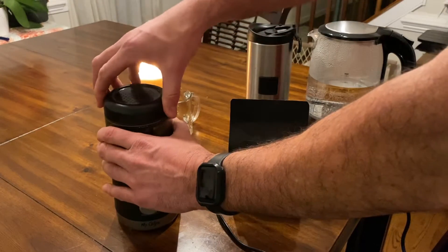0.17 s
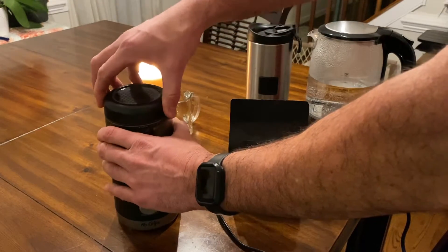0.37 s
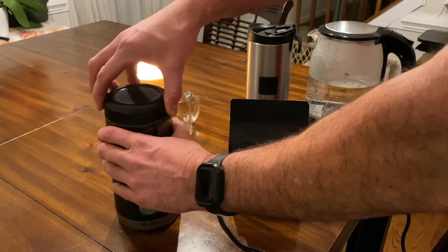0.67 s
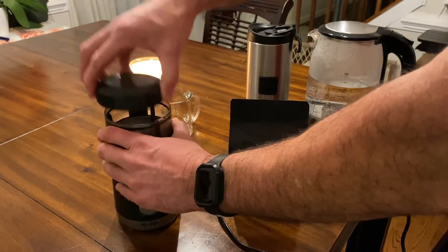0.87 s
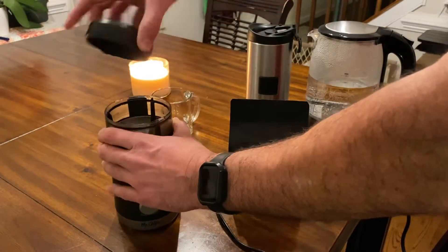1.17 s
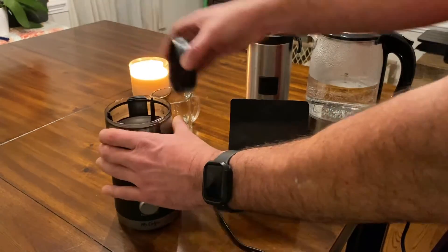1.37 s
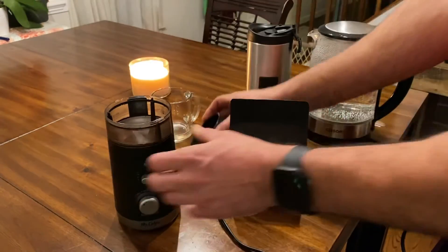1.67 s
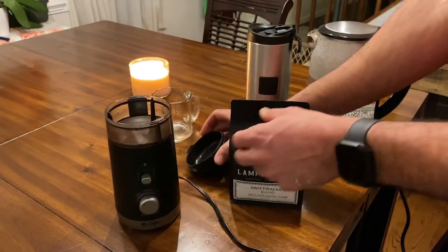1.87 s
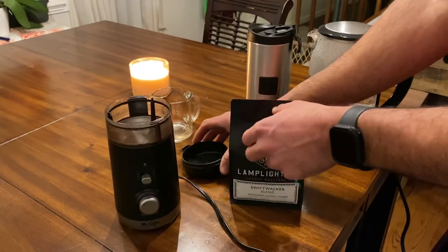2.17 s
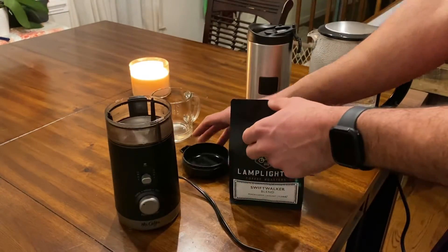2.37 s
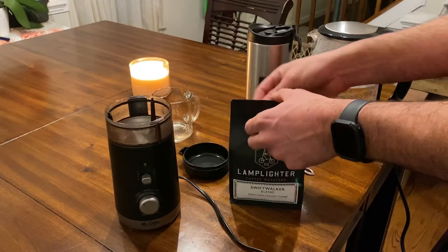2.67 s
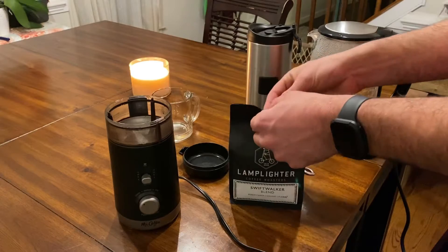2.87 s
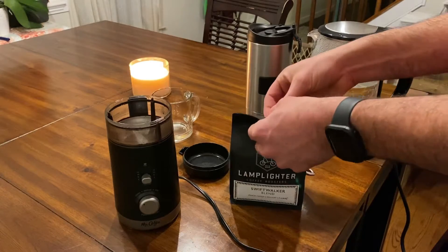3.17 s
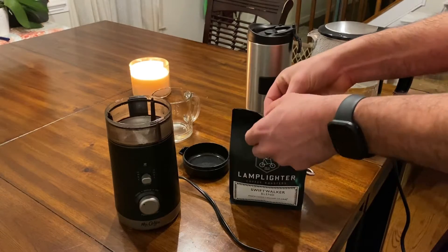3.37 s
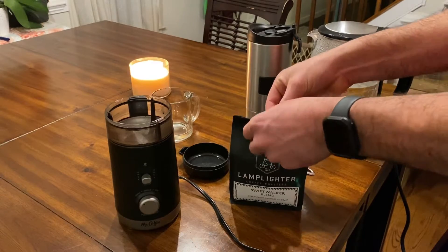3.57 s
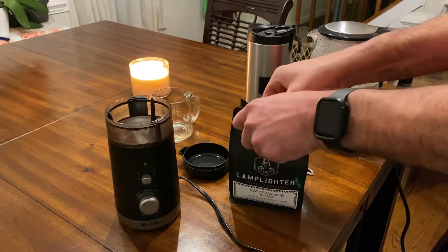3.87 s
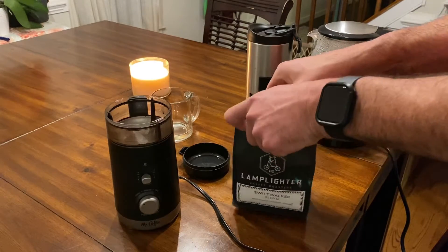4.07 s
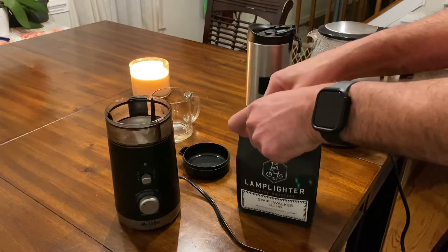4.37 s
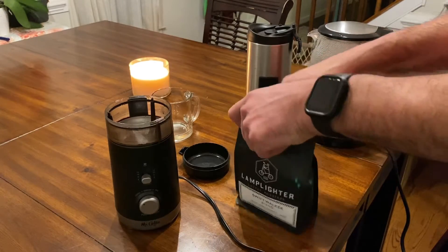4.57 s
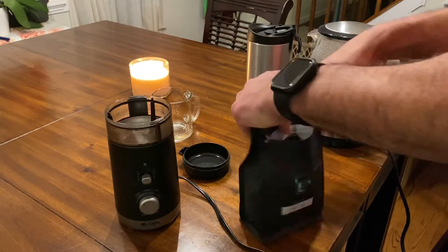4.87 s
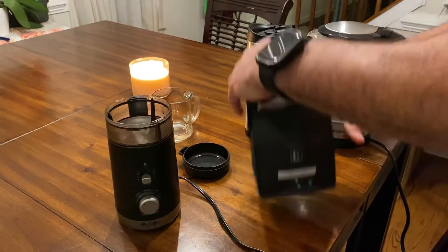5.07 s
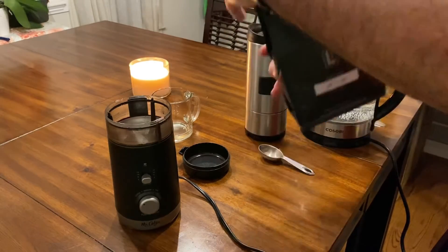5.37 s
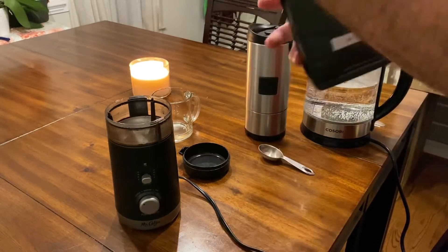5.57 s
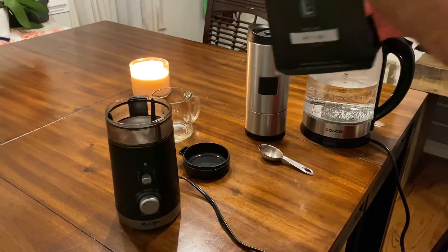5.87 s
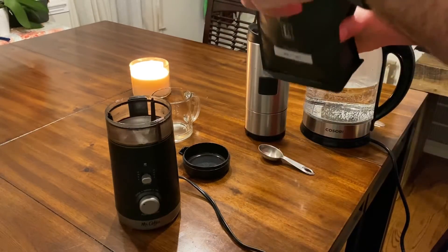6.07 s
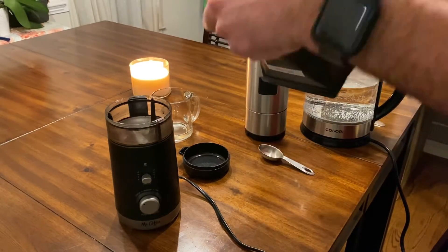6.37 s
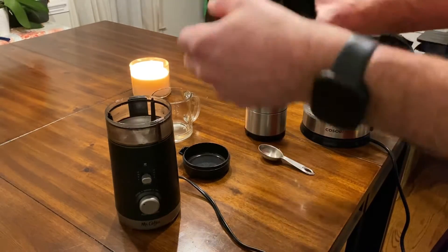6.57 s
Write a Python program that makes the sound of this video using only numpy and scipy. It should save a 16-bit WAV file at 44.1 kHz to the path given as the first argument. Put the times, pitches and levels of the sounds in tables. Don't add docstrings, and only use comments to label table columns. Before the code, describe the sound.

Close up in a small kitchen, a lid comes free with a rising gulp, lands hollowly, scrapes, and a foil coffee bag rustles and snaps.

```python
import sys
import numpy as np
from scipy import signal
from scipy.fft import rfft, irfft, next_fast_len
from scipy.io import wavfile
from scipy.ndimage import uniform_filter1d

SR = 44100
rng = np.random.default_rng(int(sys.argv[2]) if len(sys.argv) > 2 else 0)


def attenuation_scalar(level_db):
    decades = np.asarray(level_db, float) / 20
    return 10 ** decades


def generate_wav(sig):
    pcm = np.round(np.clip(np.atleast_2d(sig).T, -1, 1) * 32767).astype(np.int16)
    wavfile.write(sys.argv[1], SR, pcm)


N = 296793

# frequency in Hz, level in dB per Hz.
RUMBLE = [(15, -46), (25, -31), (40, -9.5), (65, 2), (92, -10), (154, -9.5), (171, -17), (207, -9.5),
          (265, -22), (455, -25), (565, -33.5), (1380, -49), (16300, -64.5)]
RUMBLE_DB = -52
# frequency in Hz, likeness from 0 to 1.
RUMBLE_ALIKE = [(60, .991), (130, .92), (290, .8), (640, .2), (15000, .1)]

# frequency in Hz, level in dB per Hz.
FOIL = [(250, -38.5), (500, -20.5), (900, -7.5), (1500, 4), (3000, -1.5), (5000, 2), (8000, -15.5),
        (16000, -6)]
# start in seconds, length in seconds, level in dB,
# brightness in dB.
SETTLES = [(0, .13, -58.5, 0), (.36, 0.038, -61, 0.5), (.612, 0.007, -71, -3), (1.027, 0.011, -76, -3.5),
           (2.092, 0.24, -64, 8.5), (2.73, 0.18, -55, 3.5), (3.48, .17, -57.5, 3.5),
           (3.92, 0.026, -49.5, 4.5), (4.14, 0.019, -38, -2), (4.51, 0.16, -50, 0.5),
           (4.69, 0.228, -49.5, 3), (4.9, 0.13, -69.5, -1.5), (5.09, 0.024, -65, 5.5),
           (5.24, 0.1, -56, -1.5), (5.37, 0.06, -53, 1.5), (5.65, 0.16, -44.5, -0.5),
           (5.8, 0.12, -50.5, -0.5), (6.17, 0.041, -37.5, 0.5), (6.29, 0.23, -51.5, -1),
           (6.55, 0.018, -68, -1)]
# start in seconds, length in seconds, level in dB, brightness in dB.
HOLDS = [(1.24, 0.072, -81, 2), (1.9, 0.21, -72, -6.5), (2.28, 0.27, -60, 3.5), (2.67, 0.049, -63.5, -4),
         (2.936, 0.042, -64.5, 7), (3.024, 0.18, -62, 4), (3.345, 0.13, -60, 1.5), (3.97, 0.13, -59, 7),
         (4.2, 0.27, -59.5, -1.5), (5.57, 0.045, -57, -1.5), (6.02, 0.085, -50.5, 1)]
# start in seconds, length in seconds, final level in dB,
# brightness in dB.
PULLS = [(.43, 0.047, -59, 2), (.716, 0.087, -48.5, 1.5), (1.35, 0.047, -69, -3), (1.7, 0.12, -59.5, 1),
         (3.25, 0.065, -53.5, 1.5), (5.15, 0.092, -50.5, 3), (5.46, 0.077, -48.5, -1.5),
         (5.6, 0.042, -49, -1.5)]
SAG_DB_PER_S, SWELL_DB_PER_S, ATTACK_DB_PER_S, RELEASE_DB_PER_S = 52.5, 177.5, 1492, 322
LOW_DB, LOW_PER_BRIGHT, HIGH_DB = -0.5, -1.8, -4.5
TOP_DB, TOP_PER_BRIGHT = -11.5, 1.6

# time in seconds, pitch in Hz, level in dB.
GULP = [
    (.778, 303, -49),
    (.787, 447, -47.5),
    (.797, 745, -47),
    (.81, 900, -44.5),
    (.815, 1000, -62.5),
]
GULP_FLUTTER = 0.94
# start in seconds, level in dB, pitch in Hz,
# time to fall 60 dB in seconds.
THUDS = [(.785, -39.5, 149.5, 0.16), (1.78, -35, 343, 0.12), (2.499, -41, 111, 0.16),
         (2.602, -49, 278, 0.041), (2.85, -32.5, 230, 0.015), (2.921, -38.5, 67.3, 0.24),
         (3.265, -40, 290, 0.023), (3.905, -30, 280, 0.036), (4.151, -35.5, 220, 0.07),
         (4.195, -25.5, 166, 0.052), (4.201, -39.5, 57.9, 1), (4.235, -32.5, 210, 0.034),
         (4.262, -33.5, 382, 0.032), (4.695, -30.5, 293, 0.032), (5.69, -40.5, 200, 0.076),
         (6.201, -33, 224, 0.054)]
# start in seconds, level in dB, pitch in Hz,
# time to fall 60 dB in seconds.
RIM = [
    (.785, -36.5, 370, 0.034),
    (.792, -36.5, 600, 0.033),
    (.799, -39, 850, .03),
    (0.806, -34, 1100, .03),
    (.814, -36, 950, .06),
    (1.032, -61, 1100, 0.11),
    (1.032, -66, 4470, 0.12),
    (1.032, -71, 1960, .08),
    (1.8, -65, 4550, 0.35),
]

# start in seconds, peak in dB, panel pitch in Hz,
# low knock in dB, sizzle in dB.
CRISP = [(.813, -20, 775, -30.5, -0.5), (2.712, -40.5, 730, 4, -7), (2.842, -39, 2600, 4, -3.5),
         (3.3323, -20, 2600, -11, -23), (3.405, -33.5, 1830, -5.5, 1.5), (3.676, -17, 2340, -6.5, -5),
         (3.726, -25, 1560, 6.5, -6.5), (3.795, -15, 1380, -14.5, -0.5), (3.847, -19.5, 1340, -0.5, -2.5),
         (3.862, -13.5, 1510, -12, 2), (4.138, -19.5, 3500, -13, -16.5), (4.145, -18.5, 1430, 0.5, -6),
         (4.385, -41, 1570, -13, -8), (4.422, -9, 1255, -33, -5.5), (4.449, -15, 1280, -2.5, -1.5),
         (4.499, -25, 1320, 0, -7.5), (5.088, -47.5, 1090, -13, -1.5), (5.194, -32.5, 1800, -19, -10.5),
         (5.218, -16, 1830, -16, -2), (5.382, -30, 1520, -26, -6), (5.388, -22, 1355, -13, -7),
         (5.685, -14.5, 1440, -7, -1), (5.746, -18.5, 1530, -12, -1), (5.786, -18, 2030, -0.5, -1.5),
         (5.84, -36.5, 791, 4, -8), (6.159, -21, 1190, -5, -2), (6.326, -27, 1780, -9, -4),
         (6.542, -21.5, 1560, -2.5, -7)]
CRISP_PAN_DB = 0.9
# start in seconds, peak in dB, panel pitch in Hz,
# low knock in dB.
CATCH = [
    (.81, -20, 1083, -20),
]
DULL = [(1.775, -15, 1280, 3.5), (1.78, -19, 1100, 2), (2.099, -32.5, 1440, -29), (2.345, -21.5, 1150, 3.5),
        (2.753, -34.5, 1710, -6), (3.218, -46, 1210, 8), (3.264, -47, 844, 17), (3.462, -35.5, 2270, 2.5),
        (3.704, -30.5, 1150, 9.5), (4.098, -40, 1420, -1), (4.157, -23, 1210, -31), (4.758, -35, 1190, 2),
        (4.785, -40.5, 835, 1), (4.848, -32.5, 1840, -27), (5.395, -24.5, 1500, -15.5),
        (5.533, -29, 1510, -7), (5.626, -20.5, 1390, -0.5), (5.65, -16.5, 1520, -1), (5.91, -28, 754, -4),
        (6.005, -34, 754, -18), (6.033, -28, 1400, 1), (6.122, -19.5, 1570, -12), (6.299, -30.5, 940, -18),
        (6.526, -41, 1660, -10)]
TICKS = [
    (1.031, -57.5, 4450, -11.5),
    (2.099, -49, 703, -20),
    (3.027, -48, 2470, -22.5),
    (4.443, -29.5, 1350, -34),
    (6.171, -18, 1630, -5.5),
]
LEFT = [(3.904, -24, 2970, 5), (5.313, -34, 1480, -10), (5.618, -31.5, 1440, -20.5)]
BELLIES = [(0.88, -38, 730, -22.5), (2.092, -36.5, 1260, -19), (3.333, -21.5, 730, -25),
           (4.423, -19.5, 560, -3.5), (3.796, -15.5, 3200, -36)]
GRIT = [(2.298, -37, 4040, -28), (2.3191, -40, 3970, -30), (2.344, -37, 4000, -30),
        (2.3725, -40.5, 4000, -30), (2.3914, -44, 4000, -30), (2.4184, -52, 4000, -30),
        (2.4607, -56, 4000, -30), (2.4758, -42, 3980, -30), (2.669, -66, 4000, -30)]
MUTED = [(3.781, -23.5, 1680, -29), (4.349, -37, 1830, 6), (4.372, -38, 1830, -12), (4.692, -28, 970, -1),
         (4.907, -35.5, 1190, 3), (6.25, -23.5, 1330, -6), (6.314, -25.5, 1470, -34)]
MORE_POPS = [(2.683, -50, 800, -10), (3.274, -51, 800, -12), (3.291, -43, 1860, -15), (3.49, -45, 3000, -15.5),
             (4.19, -30, 2000, -9), (4.305, -48, 1590, -10), (4.814, -34.5, 2960, -15), (4.994, -53, 1090, -10),
             (5.171, -53, 4900, -20), (5.539, -33, 2090, -11), (5.564, -27, 1380, -12),
             (5.632, -25, 1010, -5.5), (5.885, -33.5, 1800, -19.5), (6.055, -32, 1710, -15),
             (6.062, -38, 2420, -15), (6.185, -19, 4470, -20.5), (6.412, -42, 2000, -15)]
# table, sizzle in dB, left over right in dB.
FAMILIES = [(MORE_POPS, -15.5, 1.2), (DULL, -16, 1.2), (TICKS, 11.4, 2.1), (LEFT, -34, 14.8), (CATCH, 6.1, 8.8),
            (BELLIES, -33.5, 1.2), (GRIT, 1, 2.8), (MUTED, -38.5, 1.2)]
NEIGHBOUR_DB, NEIGHBOUR_OCT = -6.5, .7

# frequency in Hz, time to fall 60 dB in seconds.
KITCHEN = [(200, 0.59), (530, 0.3), (1390, 0.33), (3680, 0.31), (9700, 0.18)]

# pitch in Hz, level in dB, time to fall 60 dB in seconds.
LID_MODES = [(380, -23.5, 0.21), (443, -11, 0.087), (633, -31, 0.051), (755, -11, 0.39), (819, 5, 0.054),
             (1100, 8, 0.05), (1176, 2.5, 0.081), (1480, -5, 0.043), (1680, -1.5, 0.04), (1982, -7.5, 0.07),
             (4550, -32.5, 0.1), (6380, -20.5, 0.088), (14200, -26, 0.065)]
# start in seconds, level in dB, hardness in dB per octave.
LID_BLOWS = [
    (1.032, -68, -2),
    (1.778, -25.5, 0),
    (1.798, -33.5, 2.5),
    (1.89, -41, -6),
    (2.09, -57, -7.5),
]
RING_ROUGH = .032
# time in seconds, level in dB.
SLIDE = [(2.268, -54), (2.283, -38), (2.32, -40.5), (2.34, -36), (2.41, -41.5), (2.46, -38.5),
         (2.53, -33.5), (2.58, -42.5), (2.64, -64)]
# time in seconds, extra level in dB.
JUDDER = [(2.295, 4.5), (2.343, 8.5), (2.387, 11), (2.429, 12), (2.48, 4.5), (2.508, 6), (2.539, 6.5)]
# pitch in Hz, width in Hz, level in dB.
DRAG = [(376.5, 54, 3), (464, 37, -0.5), (550, 110, -2), (790, 66, 2), (900, 57, -1.5), (1154, 107, -1.5),
        (1553, 114, -6), (2010, 130, -6), (3450, 520, -24), (4530, 320, -22.5), (5830, 400, -31),
        (7400, 500, -33)]

# centre in Hz, width in Hz, level in dB.
HOLLOWS = [(8550, 230, -17), (12150, 1000, -15), (16300, 2200, -29)]
# centre in Hz, width in Hz, level in dB.
GAPS = [(8510, 1000, -9.5), (12160, 1330, -21.5), (14700, 990, -1.5), (16300, 1400, -30)]
TOP_HZ = 16500
LEAD_S = 1 / SR
LEAD_TOP_HZ = 9900


def unit(x):
    return x / np.sqrt(np.mean(x ** 2) + 1e-20)


def along(points, hz):
    f, v = np.transpose(points)
    return np.interp(np.log(hz + 1), np.log(f + 1), v)


def curves(rows):
    s, *cols = np.transpose(rows)
    return [np.interp(np.arange(N) / SR, s, c, left=-150, right=-150) for c in cols]


def filtered(x, response):
    n = x.shape[-1]
    m = next_fast_len(n + min(n, 4096))
    return irfft(rfft(x, m) * response(np.fft.rfftfreq(m, 1 / SR)), m)[..., :n]


def peak(f, hz, width_hz):
    return 1j * f * width_hz / (hz * hz - f * f + 1j * f * width_hz)


def notches(f, gaps):
    return attenuation_scalar(sum(db * np.exp(-((f - hz) / w * 2) ** 4) for hz, w, db in gaps))


def add(track, s, sound):
    start = round(s * SR)
    track[..., start:start + sound.shape[-1]] += sound


def rush(patchy_db, grain_rate=0, spread_db=0):
    raw = rng.standard_normal((2, N))
    hit, size = rng.random(N), rng.exponential(size=N)
    grain = (hit < grain_rate / SR) * attenuation_scalar(spread_db * np.minimum(size, 2.5) + 10.0)
    z = signal.stft(raw + grain * raw, nperseg=512)[2]
    field = rng.standard_normal(z.shape[1:])
    field = uniform_filter1d(field, size=6, axis=0)
    field = uniform_filter1d(field, size=8, axis=1)
    patches = z * attenuation_scalar(patchy_db * unit(field))
    return unit(signal.istft(patches, nperseg=512)[1][:, :N])


def stereo(pair, gain, alike):
    def response(hz):
        turn = np.arccos(np.clip(along(alike, hz), -1, 1)) / 2
        return gain(hz) * np.array([np.cos(turn), np.sin(turn)])

    mid, side = filtered(pair, response)
    return unit(np.array([mid + side, mid - side]))


def appliance():
    noise = stereo(rush(patchy_db=2.0), lambda f: attenuation_scalar(along(RUMBLE, f)), RUMBLE_ALIKE)
    return attenuation_scalar(RUMBLE_DB) * noise


def strokes():
    t, gains = np.arange(0, N / SR + .01, .001), 0
    for rows, slope in [(SETTLES, -SAG_DB_PER_S), (HOLDS, 0), (PULLS, SWELL_DB_PER_S)]:
        s, length, db, bright_db = np.transpose(rows)[..., None]
        shape_db = db + slope * (np.clip(t - s, 0, length) - length * (slope > 0))
        shape_db = shape_db - ATTACK_DB_PER_S * np.maximum(s - t, 0)
        shape_db = shape_db - RELEASE_DB_PER_S * np.maximum(t - s - length, 0)
        low_db = LOW_DB + LOW_PER_BRIGHT * bright_db
        top_db = TOP_DB + TOP_PER_BRIGHT * bright_db
        tone_db = np.array([0 * bright_db, low_db, HIGH_DB + bright_db, top_db])
        gains = gains + attenuation_scalar(shape_db + tone_db).sum(axis=1)
    return [np.interp(np.arange(N) / SR, t, g) for g in gains]


def rustle():
    pair = rush(patchy_db=3.5, grain_rate=700, spread_db=2.0)
    parts = [(2260, 2950), (600, 387), (8700, 5170), (13880, 7100)]
    alike = [(300, 0.18), (1000, 0.086), (5000, 0.7), (15000, 0.17)]
    out = 0
    for gain, (hz, w) in zip(strokes(), parts):
        out = out + gain * stereo(pair, lambda f: attenuation_scalar(along(FOIL, f)) * peak(f, hz, w) ** 2, alike)
    return out


def gulp():
    hz, db = curves(GULP)
    flutter = 1 + GULP_FLUTTER * unit(uniform_filter1d(rng.standard_normal(N), size=120))
    return attenuation_scalar(db) * flutter * np.sin(2 * np.pi * np.cumsum(hz) / SR)


def thuds():
    out, t = np.zeros(N + SR), np.arange(SR // 2) / SR
    for s, db, hz, t60 in THUDS + RIM:
        soft_start = 1 - np.exp(-t * hz / 0.21)
        add(out, s, attenuation_scalar(db - 60 * t / t60) * np.sin(2 * np.pi * hz * t) * soft_start)
    return out[:N]


def one_snap(hz, knock_db, sizzle_db):
    t = np.arange(1024) / SR
    noise = rng.standard_normal((5, len(t)))
    other_hz = hz * 2 ** (NEIGHBOUR_OCT * rng.uniform(-1, 1))
    parts = [(-4, hz, 0.3 * hz, .0019), (0, hz, 1.93 * hz, .0018),
             (NEIGHBOUR_DB, other_hz, 0.24 * other_hz, .0022),
             (knock_db, 420, 560, .0035), (sizzle_db, 6000, 12000, .0015)]
    norm = lambda x: x / np.linalg.norm(x)
    snap, power = 0, lambda f: sum(attenuation_scalar(2 * g) * abs(peak(f, c, w)) ** 6 / w for g, c, w, _ in parts)
    for n, (g, c, w, life) in zip(noise, parts):
        buckle = np.sqrt(t / life) * np.exp(-(t / life) ** 2)
        snap = snap + attenuation_scalar(g) * norm(filtered(n * buckle, lambda f: peak(f, c, w) ** 3))
    late = 1.0 * (np.arange(len(t)) == 130)
    push = np.linalg.norm(snap) * norm(filtered(late, lambda f: np.sqrt(power(f))))
    return snap, push


def snaps():
    out = np.zeros((3, N + SR))
    events = [(*row, CRISP_PAN_DB) for row in CRISP]
    for rows, *kind in FAMILIES:
        events += [(*row, *kind) for row in rows]
    for s, db, hz, knock_db, sizzle_db, pan_db in events:
        snap, push = one_snap(hz, knock_db, sizzle_db)
        sides = np.array([snap * attenuation_scalar(pan_db / 2), snap * attenuation_scalar(-pan_db / 2), push])
        add(out, s, attenuation_scalar(db + 7.5) * sides)
    return out[:, :N]


def kitchen(x, count=24):
    out, edge = np.zeros((2, N + SR)), np.linspace(0, N, count + 1).astype(int)
    for a, b in zip(edge, edge[1:]):
        hz, t, z = signal.stft(rng.standard_normal((2, SR // 2)), SR, nperseg=256)
        decay = attenuation_scalar(-60 * t / along(KITCHEN, hz)[:, None])
        tail = signal.istft(z * decay, SR, nperseg=256)[1][:, :SR // 2]
        tail = tail + 0.13 * tail[::-1]
        tail = tail / np.linalg.norm(tail[0])
        add(out, a / SR + 0.001015, signal.fftconvolve(x[None, a:b], tail, axes=1))
    return out[:, :N]


def lid_landing():
    out, t = np.zeros(N + SR), np.arange(SR // 2) / SR
    for s, db, hard_db in LID_BLOWS:
        ring = 0
        for hz, mode_db, t60 in LID_MODES:
            level = mode_db + hard_db * np.log2(hz / 1000) + rng.normal(0, 1.4)
            wander = RING_ROUGH * np.cumsum(rng.standard_normal(len(t)))
            ring = ring + attenuation_scalar(level - 60 * t / t60) * np.sin(2 * np.pi * hz * t + wander)
        add(out, s, attenuation_scalar(db) * ring * (1 - np.exp(-t / 0.0021)))
    return out[:N]


def lid_drag():
    t = np.arange(N) / SR
    slips_db = sum(db * np.exp(-((t - s) / 0.0071) ** 2) for s, db in JUDDER)
    grit = rush(patchy_db=0.75, grain_rate=600, spread_db=4)[0]
    grit = grit * attenuation_scalar(curves(SLIDE)[0] + slips_db - 3.5)
    body = lambda f: sum((-1) ** k * attenuation_scalar(db) * peak(f, hz, w) for k, (hz, w, db) in enumerate(DRAG))
    return attenuation_scalar(16.0) * filtered(grit, body)


def scene():
    steady = appliance() + rustle()
    crease = snaps()
    cap = lid_landing() + lid_drag()
    echo = attenuation_scalar(-4.0) * kitchen(crease[2] + attenuation_scalar(2.5) * cap)
    soft = filtered(echo + steady, lambda f: notches(f, HOLLOWS))
    return crease[:2] + cap * attenuation_scalar([[1.5], [-1.5]]) + thuds() + gulp() + soft


def roll_off(x):
    return signal.sosfilt(signal.butter(12, 16470, fs=SR, output="sos"), x)


def record(dry):
    side = np.array([[1], [-1]])
    thin = lambda f: notches(f, GAPS) * (f < TOP_HZ)
    apart = lambda f: np.exp(1j * np.pi * np.minimum(f, LEAD_TOP_HZ) * LEAD_S * side)
    return roll_off(filtered(dry, lambda f: thin(f) * apart(f)))


dry = scene()
out = record(dry)
generate_wav(out)
```